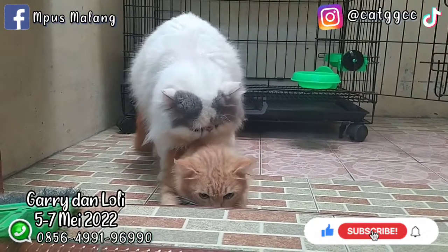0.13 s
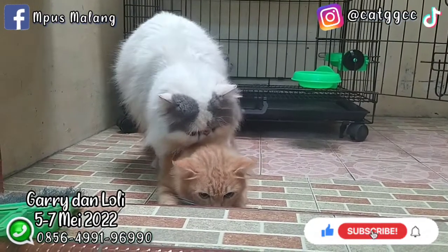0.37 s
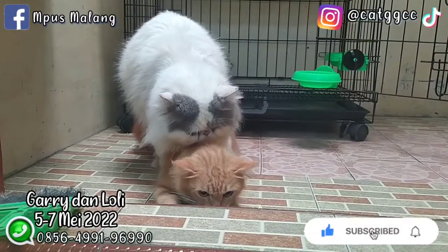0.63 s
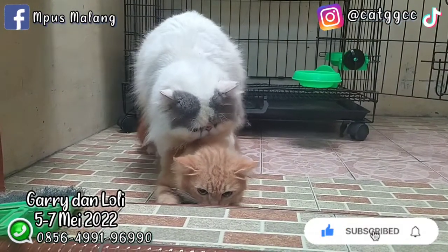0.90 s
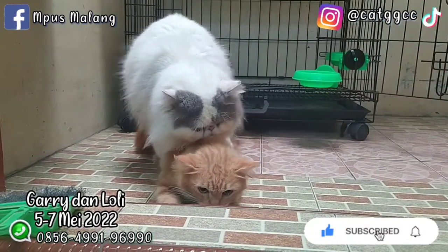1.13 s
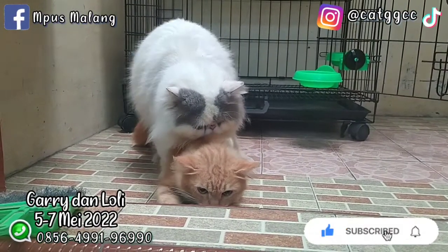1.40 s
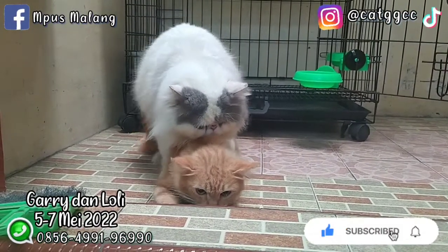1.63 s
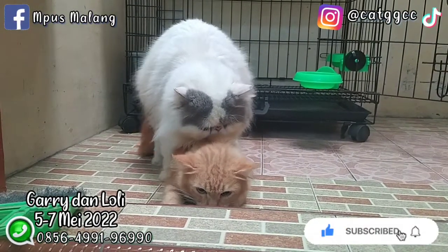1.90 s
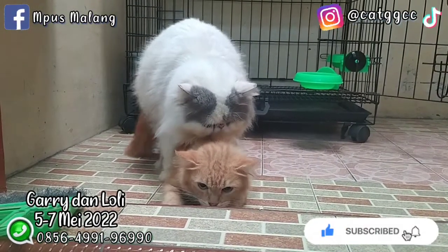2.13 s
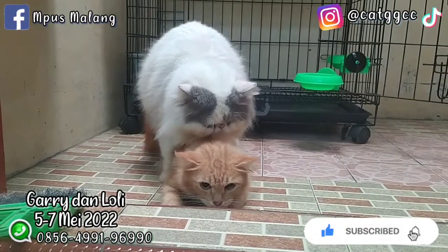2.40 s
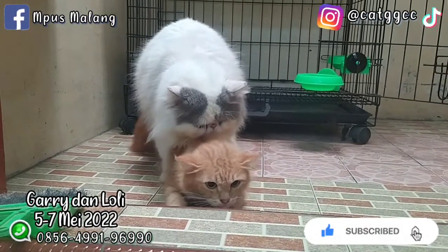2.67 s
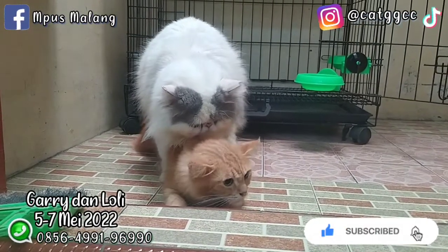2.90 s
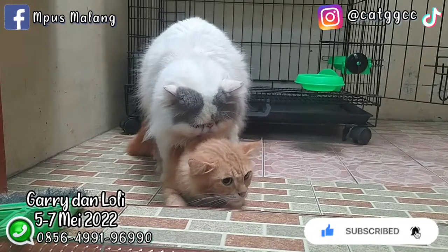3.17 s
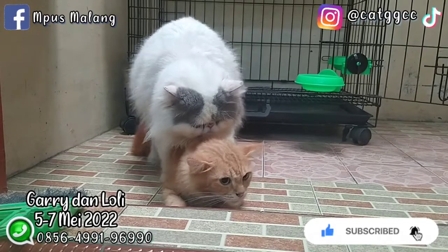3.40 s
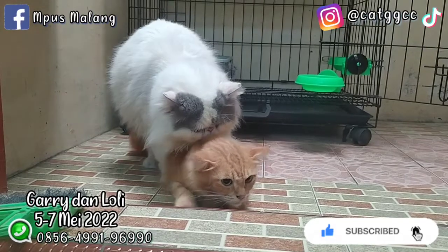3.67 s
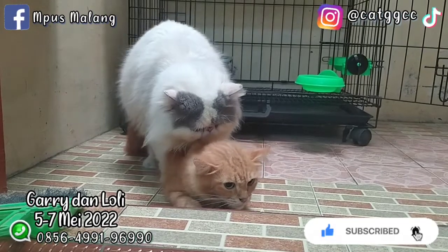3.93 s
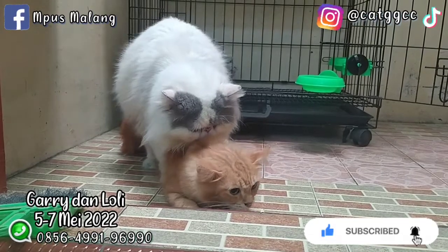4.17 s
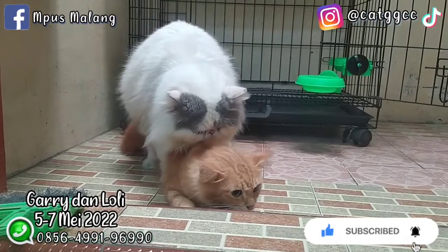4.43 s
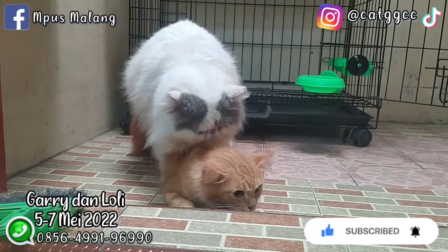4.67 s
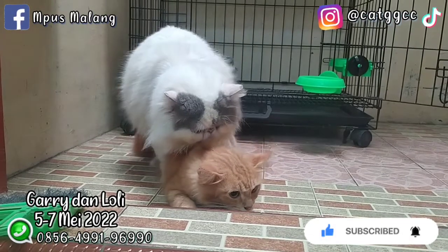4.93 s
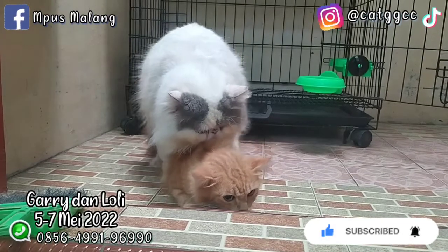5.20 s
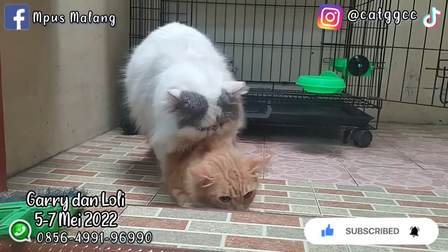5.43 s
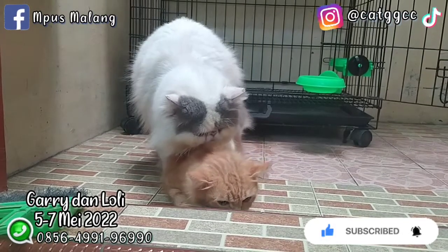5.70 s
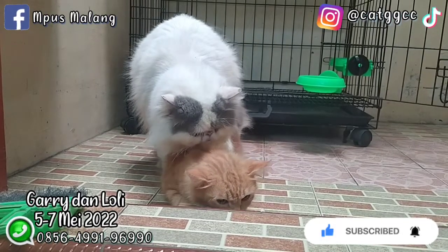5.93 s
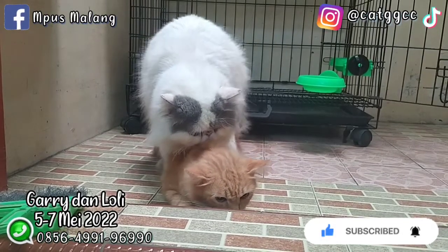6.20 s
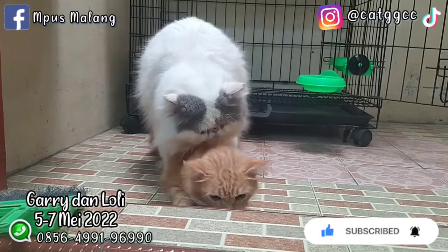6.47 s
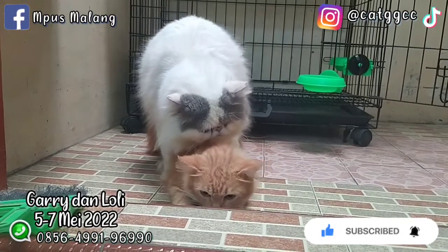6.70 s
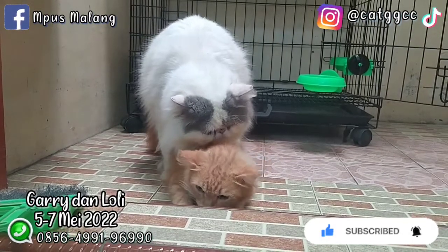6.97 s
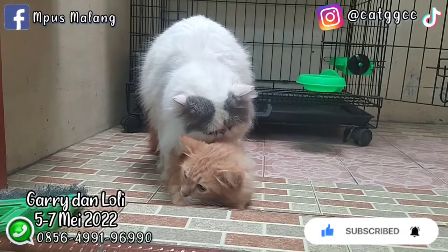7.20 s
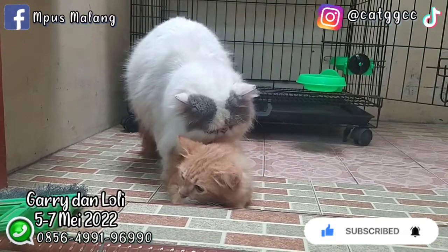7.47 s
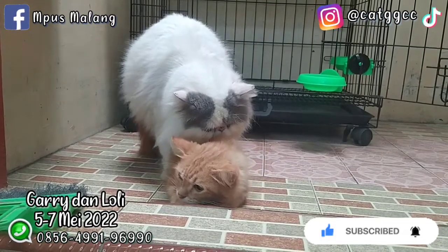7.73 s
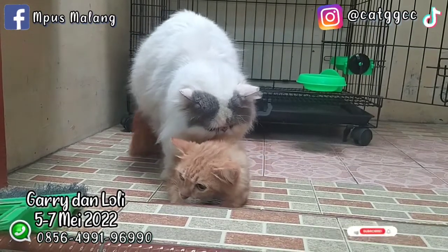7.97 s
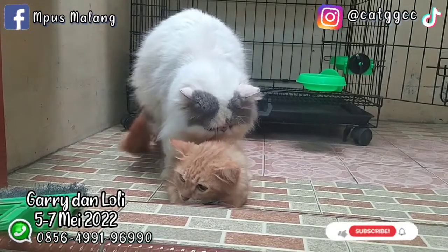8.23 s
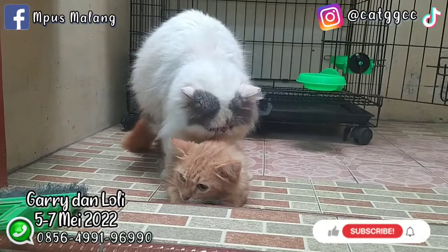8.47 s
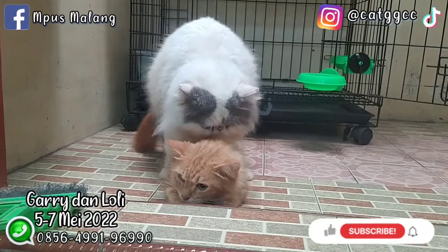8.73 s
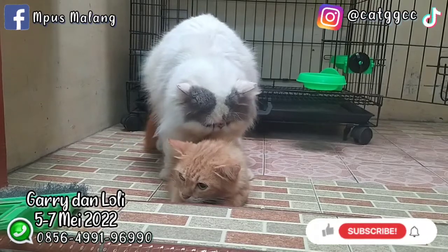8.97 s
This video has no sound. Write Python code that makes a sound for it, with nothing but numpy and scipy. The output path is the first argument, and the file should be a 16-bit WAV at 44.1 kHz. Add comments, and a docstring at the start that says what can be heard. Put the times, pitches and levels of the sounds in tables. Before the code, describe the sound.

A cat growls five low, hoarse, closed-mouth yowls, the second breaking into a clear whine, with fur rustles, paw scuffs and soft thuds in a small hard room.

```python
"""From the start a small hard room hums, fur rustles from body shifts and faint peeps sound far off.
A cat held down on a tiled floor then growls five low, hoarse yowls, mouth nearly shut: uneven fold
pulses through a throat, a chest tone and nasal wheeze. From 1.8 s paws scuff as dying noise bursts;
the second yowl breaks up into a clear whine. At 4.7 s and 8.7 s a thud rings a few low modes.
Cat, thuds and peeps echo off the walls; late in the scene a few more peeps sound."""
import sys
import numpy as np
from scipy import signal
from scipy.fft import rfft, irfft, next_fast_len
from scipy.io import wavfile
from scipy.ndimage import uniform_filter1d

SR = 44100
rng = np.random.default_rng(int(sys.argv[2]) if len(sys.argv) > 2 else 0)


def put_to_file(sound):
    """Save the sound as 16-bit audio at rate SR, in the file named by the first command-line argument."""
    columns = np.atleast_2d(sound).T  # one column per channel
    safe = np.clip(columns, -1, 1)
    whole_steps = np.round(safe * 32767)
    wavfile.write(sys.argv[1], SR, whole_steps.astype(np.int16))


def gain_from_db(level_db):
    """Convert decibel levels to linear amplitude factors (20 dB per decade)."""
    decades = np.asarray(level_db, float) / 20
    return 10 ** decades


N = 401751


def evened(x):
    """Scales to rms 1."""
    return x / np.sqrt(np.mean(x ** 2) + 1e-20)


def read(points, hz):
    """Reads a spectrum on a log-frequency axis."""
    f, value = np.transpose(points)
    return np.interp(np.log(hz + 1), np.log(f + 1), value)


def add(mix, start_s, sound):
    """Mixes a sound in at start_s, cut off at the end of the mix."""
    part = mix[..., round(start_s * SR):][..., :sound.shape[-1]]
    part += sound[..., :part.shape[-1]]


def filtered(x, order, hz, kind="low"):
    """Butterworth filter."""
    return signal.sosfilt(signal.butter(order, hz, kind, fs=SR, output="sos"), x)


def wander(size, hz):
    """Slow chance of rms 1, up to hz."""
    return evened(filtered(rng.standard_normal(size), 2, hz))


def coloured(x, db_of_hz):
    """Weights the spectrum of x along its last axis."""
    size = next_fast_len(x.shape[-1])
    weight = gain_from_db(db_of_hz(np.fft.rfftfreq(size, 1 / SR)))
    return irfft(rfft(x, size) * weight, size)[..., :x.shape[-1]]


# Left-right likeness. Each row: frequency in Hz, likeness 0-1.
LIKENESS_HZ = [(60, 0.51), (180, 0.96), (550, 0.14), (1650, 0.0071), (4970, 0.01), (15000, 0.01)]


def paired(pair):
    """Two unrelated signals made alike in the bass, as two close microphones hear a room."""
    size = pair.shape[1]
    mid, side = rfft(pair)
    same = read(LIKENESS_HZ, np.fft.rfftfreq(size, 1 / SR))
    mid = mid * np.sqrt((1 + same) / 2)
    side = side * np.sqrt((1 - same) / 2)
    return irfft(np.array([mid + side, mid - side]), size)


# Hum spectrum. Each row: frequency in Hz, relative density in dB per Hz.
HUM_HZ_DB = [(12, -6.5), (25, -4.5), (40, -15), (60, -10.5), (85, -12), (110, -9.5), (160, -14.5),
             (250, -16), (420, -25), (800, -29.5), (1700, -34.5), (4000, -41.5), (8200, -47),
             (10500, -48.5), (15500, -62)]
HUM_BAND_HZ, HUM_BAND_DB, HUM_FADE_DB_PER_S = [1200, 3000], -67.5, 0.545  # starting level in that band


def hum():
    """Air and distant rumble: coloured noise, slowly dying down."""
    air = coloured(paired(rng.standard_normal((2, N + 1)))[:, :N], lambda f: read(HUM_HZ_DB, f))
    band = filtered(air, 4, HUM_BAND_HZ, "band")
    level_db = HUM_BAND_DB - HUM_FADE_DB_PER_S * np.arange(N) / SR + 1.0 * wander(N, hz=11.0)
    return gain_from_db(level_db) * air / band.std()


# Fur spectrum. Each row: frequency in Hz, relative density in dB per Hz.
FUR_HZ_DB = [(900, -63), (1500, -11), (3000, -13), (4600, -12), (7000, -9.5), (8300, -5.5), (9400, -1),
             (10500, -6.5), (11500, -13.5), (13000, -21.5), (15500, -15.5)]
# One body shifting against the other. Each row: centre in seconds, peak level in dB,
# length in seconds between the points faded by STROKE_EDGE_DB.
STROKES_S_DB_S = [(0.164, -48, 0.054), (0.35, -57, 0.13), (0.465, -62, .1), (0.605, -61, 0.1),
                  (0.756, -61, 0.079), (0.967, -53, 0.086), (1.19, -60.5, 0.27), (1.428, -59.5, 0.47),
                  (1.567, -53, 0.098), (1.659, -55.5, 0.081), (1.743, -50.5, 0.21), (1.989, -54, 0.13),
                  (2.217, -54, 0.16), (2.436, -52, 0.11), (2.537, -49, 0.099), (2.814, -58.5, 0.11),
                  (3.27, -62, 0.28), (3.395, -57.5, 0.22), (3.646, -57, 0.6), (3.846, -50, 0.2),
                  (4.006, -53, 0.28), (4.234, -42.5, 0.075), (4.427, -60.5, 0.35), (4.567, -53, 0.2),
                  (4.778, -59, 0.16), (5.034, -57.5, 0.2), (5.095, -59.5, 0.057), (5.461, -48, 0.051),
                  (5.643, -63, 0.98), (5.79, -57, 0.14), (5.965, -57.5, 0.36), (6.165, -54.5, 0.12),
                  (6.29, -57, 0.056), (6.363, -48, 0.058), (7.047, -52.5, 0.15), (7.258, -59, 0.48),
                  (7.389, -60.5, 0.18), (7.597, -56.5, 0.21), (7.802, -55, 0.23), (7.972, -56.5, 0.17),
                  (8.025, -53, 0.12), (8.118, -62, 0.063), (8.721, -58, 0.05), (8.797, -64, .1),
                  (8.92, -55.5, 0.083)]
STROKE_EDGE_DB, FUR_REST_DB = -16, -68.5  # fur never quite still


def fur():
    """Dense tiny crackles of hair on hair and tile, unrelated left and right; each stroke swells and fades."""
    grain = rng.standard_normal((2, N)) * gain_from_db(2.03 * wander(N, hz=40.2))
    power = gain_from_db(FUR_REST_DB + 0.22 * wander(N, hz=3.3)) ** 2
    for centre_s, db, length_s in STROKES_S_DB_S:
        u = np.linspace(-2, 2, round(2 * length_s * SR))
        add(power, max(centre_s - length_s, 0), gain_from_db(db + STROKE_EDGE_DB * abs(u)) ** 2)
    return np.sqrt(power) * evened(coloured(grain, lambda f: read(FUR_HZ_DB, f)))


# Each row: start in seconds, length in seconds, pitch in Hz, direct peak level in dB.
PEEPS_S_S_HZ_DB = [(0, 0.03, 1770, -62), (0.06, 0.08, 1760, -65), (0.12, 0.1, 1610, -67),
                   (0.19, 0.07, 1640, -67), (0.24, .07, 1630, -68), (0.31, 0.1, 1660, -68),
                   (3.2, .25, 4520, -78), (3.46, .06, 4520, -74), (3.55, .3, 4560, -78),
                   (8.83, 0.06, 1720, -70), (8.935, 0.07, 1725, -57), (9.05, .07, 1720, -61)]


def peeps():
    """Short, faint tones; the fainter, the more their phase blurs."""
    out = np.zeros(N)
    for start_s, length_s, hz, db in PEEPS_S_S_HZ_DB:
        t = np.arange(0, length_s, 1 / SR)
        blur_rad = np.interp(db, [-76, -66, -58], [3.5, 2.2, 0.3])
        tone = np.sin(2 * np.pi * hz * t + blur_rad * wander(len(t), hz=60))
        add(out, start_s, gain_from_db(db) * tone * np.sin(np.pi * t / length_s))
    return out


# Echo decay. Each row: frequency in Hz, t60 in seconds.
ROOM_HZ_S = [(150, 0.3), (500, 0.14), (1000, .09), (2000, 0.06), (8000, 0.14)]
# Echo against direct sound. Each row: frequency in Hz, level in dB.
WET_HZ_DB = [(150, -13), (300, -3), (600, 3), (1200, 6)]


def room(x):
    """Sparse echoes of random sign off tiles and walls; six patterns take turns as the cat shifts about."""
    out = np.zeros((2, N))
    phase = 1.5 * np.pi * np.arange(N) / SR
    for k in range(6):
        taps = np.zeros((2, SR // 4))
        slots = np.arange(100, SR // 4 - 20, 20)
        at = slots + rng.integers(0, 20, (2, len(slots)))  # one echo per 20 samples
        np.put_along_axis(taps, at, rng.choice([-1., 1.], at.shape), 1)
        hz, t, z = signal.stft(taps, SR, nperseg=512)
        decay = gain_from_db(-60 * t / read(ROOM_HZ_S, hz)[:, None])
        tail = paired(signal.istft(z * decay, SR, nperseg=512)[1])
        share = np.cos(np.pi / 2 * np.minimum(abs((phase + k) % 6 - 3), 1))
        out += signal.oaconvolve((x * share)[None], tail / np.linalg.norm(tail[0]), axes=1)[:, :N]
    return coloured(out, lambda f: read(WET_HZ_DB, f))


# Throat and nose behind a shut mouth. Each row: frequency in Hz, gain in dB.
THROAT_HZ_DB = [(100, -40), (200, -4), (250, -2), (310, 0), (380, -1), (500, -6), (630, -4), (780, -8),
                (900, -14), (1000, -22), (1150, -24), (1400, -27), (1650, -33), (2200, -40), (4000, -58)]
# Standing tones of the corner. Each row: frequency in Hz, width in Hz, lift in dB.
RINGS_HZ_HZ_DB = [(300, 60, 4.5), (445, 70, 5.5), (680, 70, 2), (830, 50, 2.5), (920, 50, 3)]


def voiced(hz):
    """Throat colour plus the lift near each standing tone, in dB."""
    lift_db = sum(db / (1 + (2 * (hz - f) / width) ** 2) for f, width, db in RINGS_HZ_HZ_DB)
    return read(THROAT_HZ_DB, hz) + lift_db


# The whine parts the lips. Each row: frequency in Hz, lift in dB.
OPENED_HZ_DB = [(100, 0), (500, 0), (750, 2), (950, 0), (1150, 4), (1500, 3), (2000, 0), (20000, 0)]
MUFFLED_DB, OPEN_DB = -56, -43  # effort at which the voice is only a murmur, and fully bright
MUFFLE_HZ, OPENING_S = 450, 0.07  # time it takes to brighten


def throat(drive, whine, effort_db, since_s):
    """The throat colours the drive, levelled out; weak effort and the onset muffle it."""
    parted = coloured(whine * drive, lambda f: read(OPENED_HZ_DB, f))
    bright = coloured((1 - whine) * drive + parted, voiced)
    bright /= np.sqrt(uniform_filter1d(bright ** 2, size=4000) + 1e-12)
    dull = coloured(bright, lambda f: -10 * np.log10(1 + (f / MUFFLE_HZ) ** 4))
    openness = np.clip((effort_db - MUFFLED_DB) / (OPEN_DB - MUFFLED_DB), 0, 1)
    openness *= np.minimum(since_s / OPENING_S, 1)
    return dull + openness * (bright - dull)


# The chest tone briefly swells or dips. Each row: centre in seconds, level change in dB, length in seconds.
SWELLS_AND_DIPS_S_DB_S = [(0.626, 3.5, 0.056), (0.997, 6, 0.17), (1.341, 3, 0.065), (1.392, 13, 0.011),
                          (1.55, 4, 0.058), (2.577, -5, 0.025), (3.338, 0, 0.06), (3.478, 5, .26),
                          (5.555, 4, 0.037), (5.731, 7, 0.043), (5.91, 7.5, 0.13), (7.186, 3.5, 0.058),
                          (7.517, 6.5, 0.27)]
CHEST_DB, THROB_DB = 6.5, 1.6
CHEST_WAKES_DB, CHEST_WAKES_S = -2, 0.44  # weak at first
CHEST_TIRES_DB, LONG_BREATH_S = -5, 1.61  # fading as the air runs out
CHEST_HZ, CHEST_WIDTH_HZ, CHEST_LEAK = 165, 28, 0.4


def chest(t, turns, whine, hoarse):
    """The chest rings at one tone and lets a share of any other through."""
    since_s = t - t[0]
    low = np.sqrt(2) * (1 - whine) * np.cos(2 * np.pi * turns)
    low *= gain_from_db(np.minimum(7 * hoarse * wander(len(t), hz=32), 1.5))  # the tone keeps breaking off
    low *= gain_from_db(CHEST_DB + THROB_DB * wander(len(t), hz=12.4))
    waking_db = CHEST_WAKES_DB * np.exp(-since_s / CHEST_WAKES_S)
    tiring_db = CHEST_TIRES_DB * (since_s / LONG_BREATH_S) ** 2.04
    low *= gain_from_db(waking_db + tiring_db)
    low *= gain_from_db(sum(db * np.exp(-(2 * (t - at) / length) ** 2) for at, db, length in SWELLS_AND_DIPS_S_DB_S))
    peak = signal.iirpeak(CHEST_HZ, CHEST_HZ / CHEST_WIDTH_HZ, fs=SR)
    return CHEST_LEAK * low + signal.lfilter(*peak, low)


# Tighter folds sound higher and beat more evenly. Each row: pitch in Hz, hoarseness 0-1.
HOARSE_HZ = [(150, .85), (165, .76), (185, .68), (205, .58), (228, .25), (300, .2), (350, .15)]
# A small chest radiates no deep bass and booms near its own tone. Each row: frequency in Hz, gain in dB.
BELOW_HZ_DB = [(60, -32), (100, -24), (135, -5), (165, 4), (205, 2), (245, -1), (300, 0), (20000, 0)]
CRACK_PER_HZ_PER_S, CRACK_FROM_HZ_PER_S = 2e-4, 1100  # folds that slacken very fast lose their evenness
WAVER, WAVER_HZ = 0.14, 18  # fully hoarse folds glide up and down by this share of the pitch
WHEEZE_DB = -41  # air hissing through the nose, against effort


def yowl(rows):
    """Folds beat unevenly in pace and strength; the overtones take their weight from the throat."""
    s, *columns = np.transpose(rows)
    t = np.arange(s[0], s[-1], 1 / SR)
    size = len(t)
    effort_db, hz = (np.interp(t, s, c) for c in columns)

    slackening = np.maximum(-np.gradient(hz) * SR - CRACK_FROM_HZ_PER_S, 0)
    falling = uniform_filter1d(slackening, size=2500, origin=1200)
    hoarse = np.clip(np.interp(hz, *np.transpose(HOARSE_HZ)) + CRACK_PER_HZ_PER_S * falling, 0, 1)
    glide = hz * WAVER * hoarse ** 2 * np.clip(wander(size, hz=WAVER_HZ), -2, 2)
    slip = np.cumsum(hz * hoarse * wander(size, hz=71.0)) / SR
    turns = np.cumsum(hz + glide) / SR + 0.13 * slip
    chest_turns = np.cumsum(hz + 0.6 * glide) / SR + 0.17 * slip  # the chest smooths the glide

    whine = np.clip((hz - 215) / 50, 0, 1)  # a high pitch lifts the first partial from chest to throat
    soft = np.clip(0.64 + hoarse * 0.6, 0, 1)  # steady folds close gently: weak upper overtones
    folds = 0.7 * whine * np.cos(2 * np.pi * turns)
    folds = folds + sum(soft ** (k - 2) * np.cos(2 * np.pi * k * turns) for k in range(2, 16))
    folds *= gain_from_db(np.minimum(7 * hoarse * wander(size, hz=65), 5))
    puffs = (1.36 + np.exp(-(turns % 1) / 0.57)) * rng.standard_normal(size)  # air at each opening
    puffs = filtered(puffs, 2, 3500)
    drive = evened(folds) + 1.25 * hoarse * evened(puffs)

    over = throat(drive, whine, effort_db, t - s[0])
    low = chest(t, chest_turns, whine, hoarse)
    wheeze = gain_from_db(WHEEZE_DB) * evened(filtered(puffs, 2, [1100, 3200], "band"))
    edges = np.clip(np.minimum(t - s[0], s[-1] - t) / 0.0045, 0, 1)
    return coloured(gain_from_db(effort_db) * (over + low + wheeze) * edges, lambda f: read(BELOW_HZ_DB, f))


# One table a yowl. Each row: time in seconds, effort in dB, pitch in Hz.
YOWLS_S_DB_HZ = [
    [(0.44, -67, 150.7), (0.452, -41, 153.3), (0.54, -45.5, 150.4), (0.598, -41, 165), (0.644, -44, 193.6),
     (0.67, -38.5, 231.4), (0.698, -39, 276.3), (0.722, -39, 280), (0.772, -44, 200.3), (0.808, -40, 251.2),
     (0.84, -39, 216.2), (0.898, -43, 215), (0.952, -43.5, 163.8), (1.058, -44.5, 152.6),
     (1.3, -43.5, 157.8), (1.42, -43.5, 167.4), (1.6, -42.5, 156.4), (1.78, -45.5, 153.4),
     (1.99, -46.5, 152.3), (2.042, -54.5, 155.1), (2.08, -76, 150)],
    [(2.48, -59, 160), (2.5, -49, 153.3), (2.564, -43, 166.1), (2.592, -39.5, 172), (2.612, -43, 295),
     (2.664, -42.5, 327), (2.724, -40.5, 348.7), (2.906, -39, 389), (3.026, -39, 375.6),
     (3.048, -44, 349.4), (3.058, -33.5, 357), (3.078, -35.5, 291), (3.098, -44, 272.5), (3.116, -38, 264),
     (3.19, -37, 228.2), (3.226, -41, 215.6), (3.286, -41.5, 194.4), (3.326, -40.5, 172),
     (3.53, -41.5, 164.9), (3.65, -40, 184.8), (3.79, -40.5, 192.7), (3.95, -40.5, 200), (4.008, -43, 162),
     (4.106, -44.5, 151.2), (4.225, -42.5, 157.8), (4.26, -54.5, 160.8), (4.3, -51, 163.6)],
    [(4.94, -97, 165.7), (4.96, -46.5, 160.2), (5.06, -44.5, 146.6), (5.134, -41, 200), (5.21, -41, 217.2),
     (5.272, -44, 169.1), (5.32, -41, 200.6), (5.39, -40, 209.3), (5.45, -41.5, 174.4),
     (5.572, -41.5, 161.1), (5.65, -40.5, 183.8), (5.72, -42.5, 164.7), (5.9, -42.5, 159),
     (6.02, -46, 149.9), (6.15, -43.5, 148.7), (6.264, -50, 155.5), (6.34, -52, 151), (6.4, -76, 149.6)],
    [(6.85, -62, 149.2), (6.882, -49.5, 148.7), (6.95, -43.5, 160.4), (7.04, -43.5, 148.5),
     (7.16, -43, 168.2), (7.24, -42, 201.2), (7.35, -44, 194.8), (7.46, -42, 169.9), (7.62, -44, 159.6),
     (7.78, -44, 147.9), (7.9, -45, 152.5), (8.026, -50, 148.4), (8.075, -53.5, 150.6), (8.12, -87, 148)],
    [(8.9, -79, 146), (8.91, -48, 150.7), (8.96, -45, 150.5), (9.028, -44, 167.8), (9.06, -43.5, 200.9),
     (9.095, -38, 214), (9.11, -49, 223)],
]


def yowls():
    """Each breath is one yowl, its effort and pitch drawn through the rows."""
    out = np.zeros(N)
    for rows in YOWLS_S_DB_HZ:
        add(out, rows[0][0], yowl(rows))
    return out


# Each row: start in seconds, level in dB, low part against treble in dB, t60 in seconds.
SCUFFS_S_DB_DB_S = [(1.8052, -42, 24, 0.057), (1.9832, -53, 11, 0.2), (2.401, -47.5, 13, 0.24),
                    (2.521, -45, -13, 0.038), (2.589, -52.5, 11, 0.23), (3.451, -51.5, 13, 0.16),
                    (4.166, -51, -28, 0.11), (4.566, -48.5, 30, 0.071), (5.426, -47, 14, 0.046),
                    (5.771, -58, -15, 0.15), (5.9115, -48.5, 5, 0.084), (6.1414, -42.5, 6, 0.19),
                    (6.329, -57, -41, 0.23), (7.9303, -51, 18, 0.17), (8.3685, -55, 8, 0.37),
                    (8.532, -54, 19, 0.058), (8.7905, -56, 25, 0.47)]


def paws():
    """A scuff on the tiles is a burst of gritty noise that starts at once and dies away."""
    out = np.zeros((2, N))
    t = np.arange(SR // 4) / SR
    for start_s, db, low_db, t60_s in SCUFFS_S_DB_DB_S:
        slope = [(300, low_db - 6), (900, low_db), (3000, low_db / 2), (6000, -1.0),
                 (9500, 0.5), (12000, -3.5), (16000, -38)]  # Hz, dB
        grit = evened(coloured(rng.standard_normal((2, len(t))), lambda f: read(slope, f)))
        add(out, start_s, gain_from_db(db - 60 * t / t60_s) * np.minimum(t / 0.002, 1) * grit)
    return out


# Each row: start in seconds, level in dB.
THUDS_S_DB = [(4.724, -44.5), (8.743, -37)]
# Modes of a thud. Each row: frequency in Hz, level in dB against the thud's, t60 in seconds.
THUD_RING_HZ_DB_S = [(254, 9, 0.066), (172, -10.5, 0.43), (318, -13.5, 0.54), (455, -5, 0.044),
                     (583, -18, 0.051)]


def thuds():
    """A soft blow rings a few low modes."""
    out = np.zeros(N)
    t = np.arange(SR // 3) / SR
    ring = sum(gain_from_db(db - 60 * t / t60_s) * np.sin(2 * np.pi * hz * t) for hz, db, t60_s in THUD_RING_HZ_DB_S)
    for start_s, db in THUDS_S_DB:
        add(out, start_s, gain_from_db(db) * ring * np.minimum(t / 0.0015, 1))
    return out


def scene():
    """Peeps, cat and thuds, direct and echoed, over hum, fur and paws."""
    direct = peeps() + yowls() + thuds()
    return hum() + fur() + direct + room(direct) + paws()


# Each row: frequency in Hz, left minus right in dB.
LEAN_HZ_DB = [(60, 1), (150, -3), (380, 0.5), (950, -1), (2380, 3), (5980, -2.5), (15000, 0)]


def microphones(x):
    """The two microphones differ a little in colour, half the difference each way."""
    left = coloured(x[0], lambda f: read(LEAN_HZ_DB, f) / 2)
    right = coloured(x[1], lambda f: -read(LEAN_HZ_DB, f) / 2)
    return np.array([left, right])


def band_limit(x):
    """A steep low-pass at the top of the band."""
    return signal.sosfilt(signal.butter(12, 15630, fs=SR, output="sos"), x)


def record(dry):
    """A quick fade over the last 200 samples, then the microphones' colour."""
    fade = np.minimum(np.arange(N)[::-1] / 200, 1)
    return band_limit(microphones(dry * fade))


dry = scene()
out = record(dry)
put_to_file(out)
```